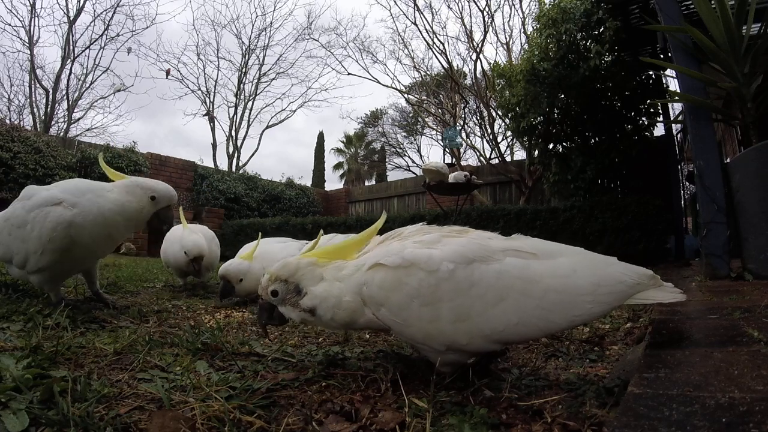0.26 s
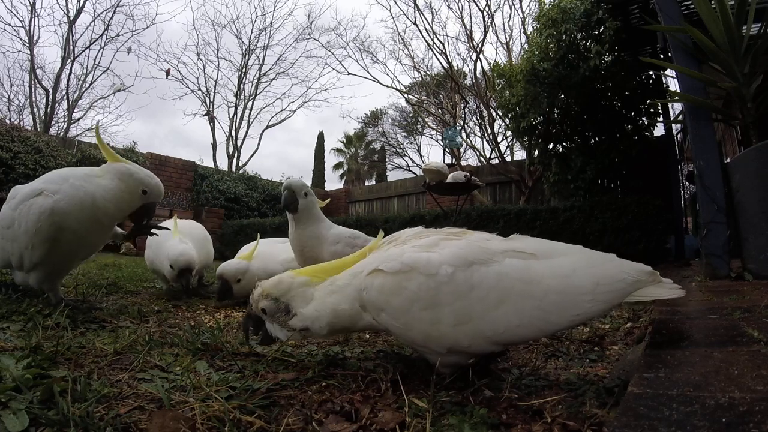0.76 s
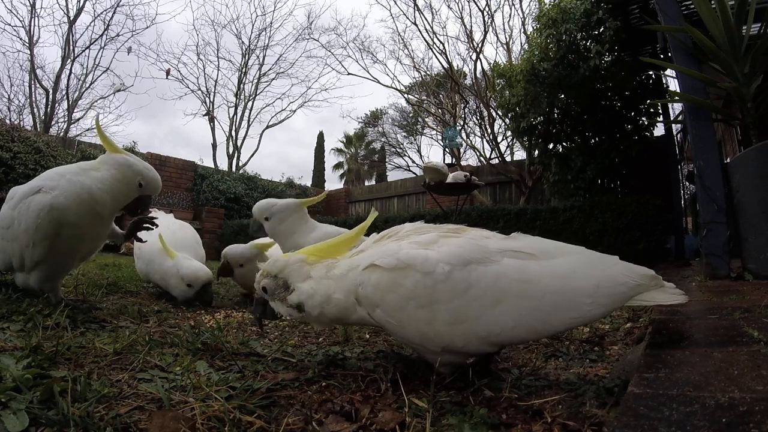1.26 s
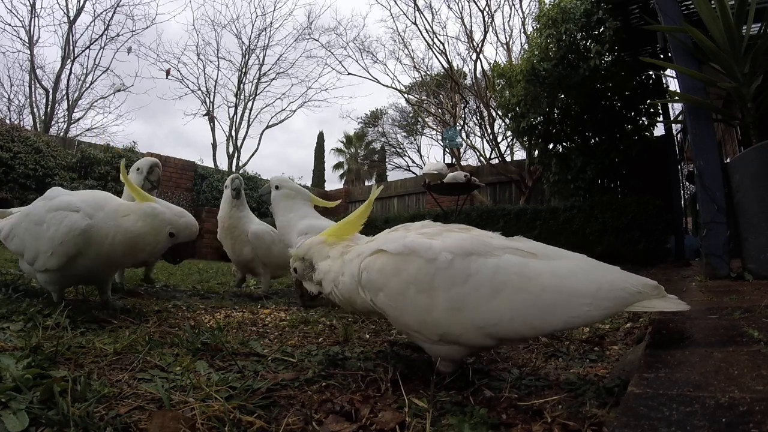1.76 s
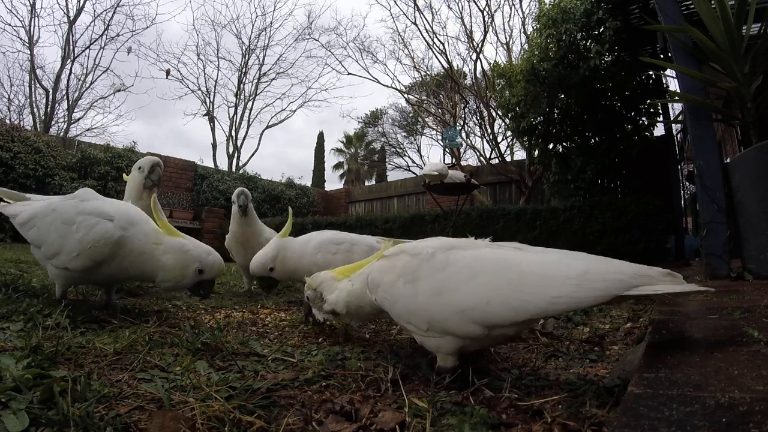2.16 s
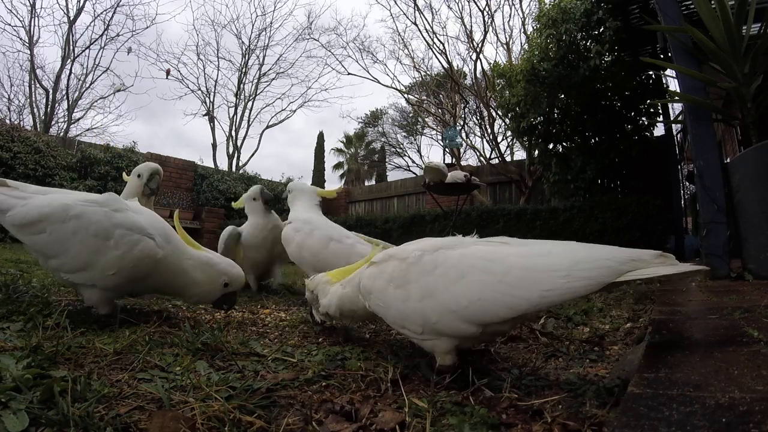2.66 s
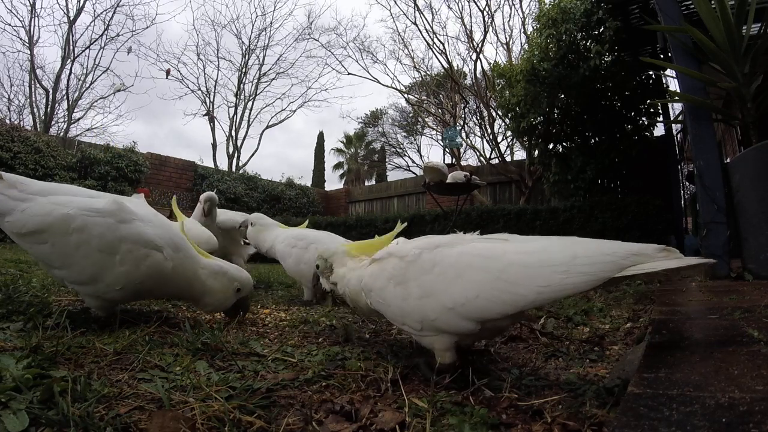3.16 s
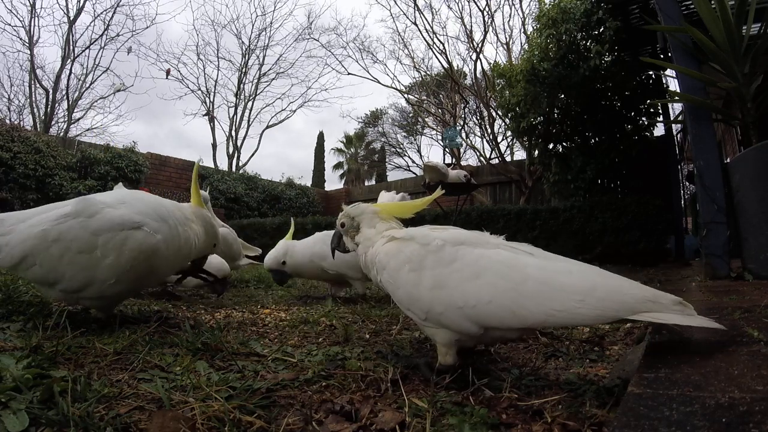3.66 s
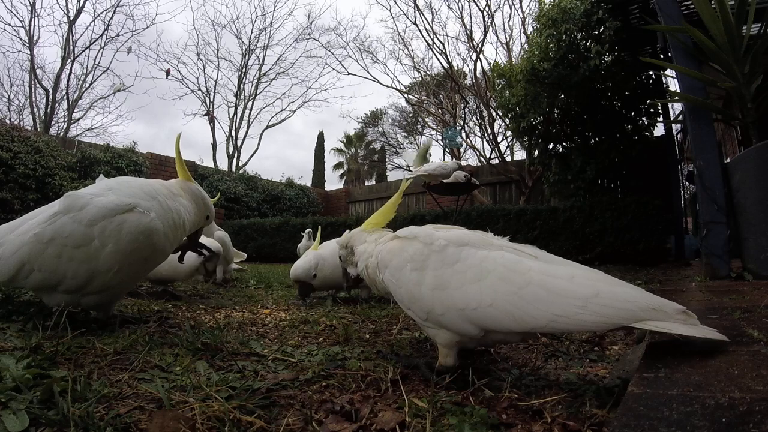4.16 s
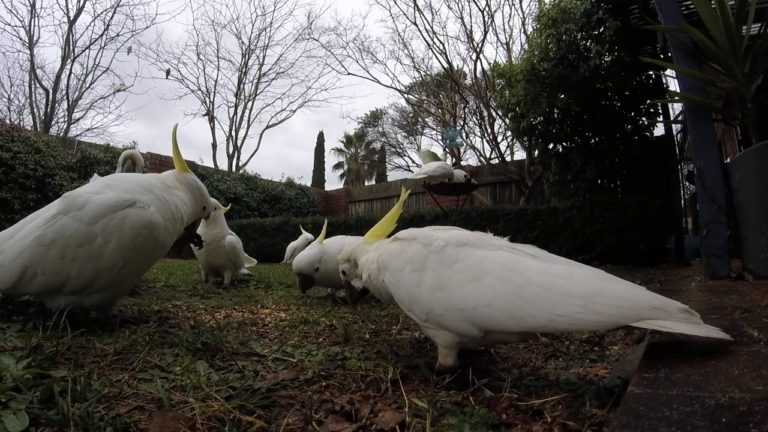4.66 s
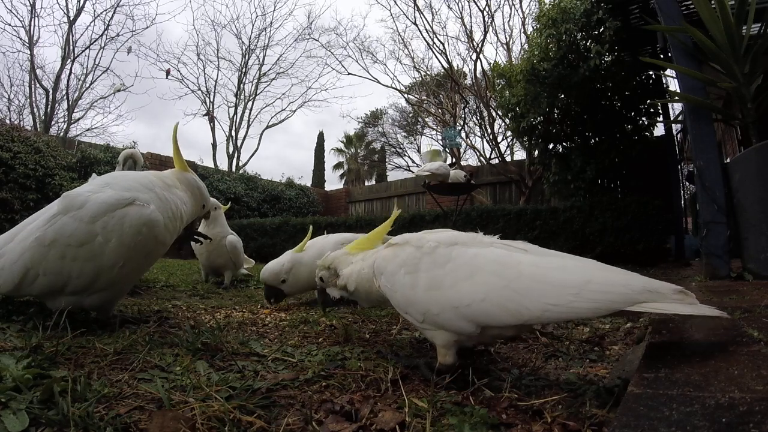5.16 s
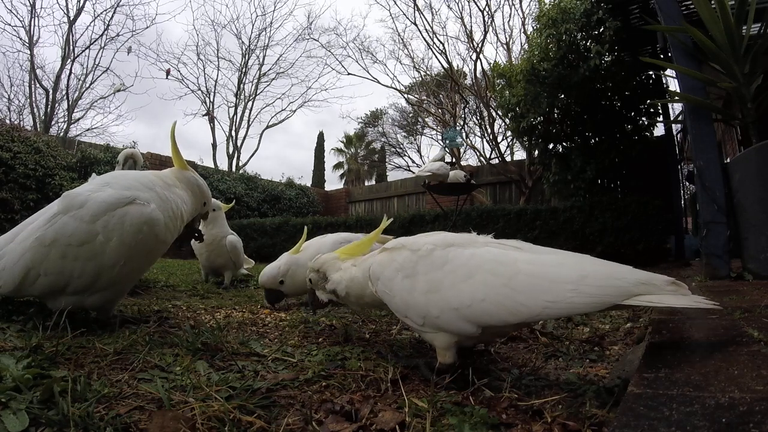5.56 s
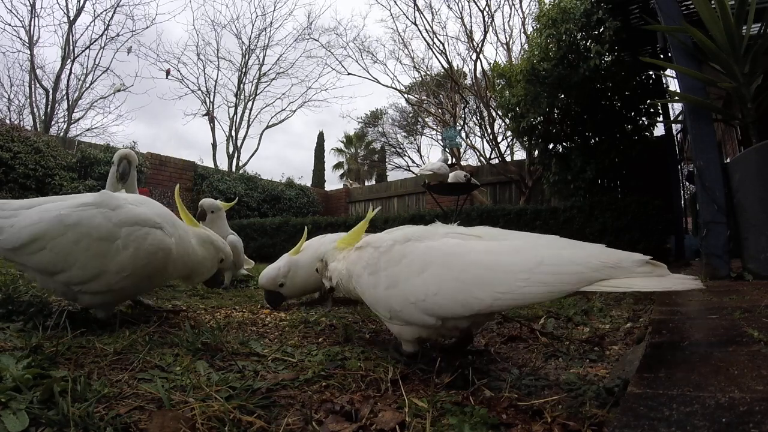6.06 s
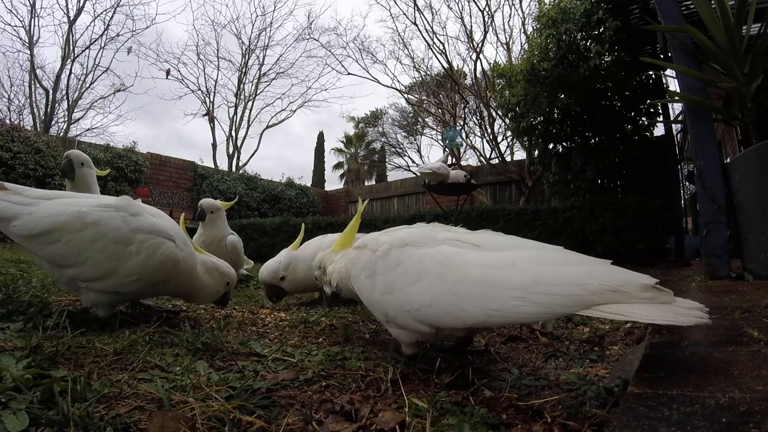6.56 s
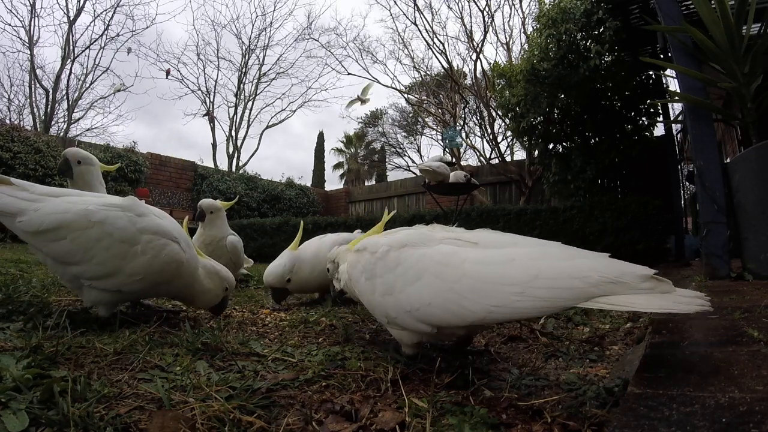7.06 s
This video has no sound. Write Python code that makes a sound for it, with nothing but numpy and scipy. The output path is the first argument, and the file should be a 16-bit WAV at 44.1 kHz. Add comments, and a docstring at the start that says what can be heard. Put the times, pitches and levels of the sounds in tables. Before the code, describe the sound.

A low, steady suburban hum, like distant traffic, runs quietly through about seven seconds in a walled garden. Nearby cockatoos crack seeds throughout, making faint, irregular, dry clicks. In the first second, a few very faint bird calls come from far away. At about 1.4 seconds a cockatoo gives a loud, harsh screech lasting a quarter of a second. A soft low thump, like a wing beat, follows at 2 seconds. Two shorter screeches come at about 2.7 and 2.9 seconds, the first rattling, the second hoarse and crackling, with another soft thump beneath it. Each screech ends in a tiny falling note and a brief echo; they are by far the loudest sounds. Afterwards the quiet feeding clicks continue, with faint distant chirps around 4.2 and 5.2 seconds and a last soft, feathery thump near 6 seconds.

```python
"""A suburb hums around a walled garden. Birds call far off while nearby cockatoos click on seeds.
At 1.4 s a squabble starts with a long, harsh screech: uneven puffs of air from the syrinx (the bird's
voice box) ring in the throat and beak, and the walls answer briefly. A soft low thump follows, then two
shorter screeches near 3 s and a second thump. Each screech ends with a brief falling note.
The feeding clicks go on, with a few more distant chirps and a last thump near 6 s."""
import sys
import numpy as np
from scipy import signal
from scipy.fft import rfft, irfft, next_fast_len
from scipy.io import wavfile
from scipy.ndimage import uniform_filter1d, map_coordinates

SR = 44100
rng = np.random.default_rng(int(sys.argv[2]) if len(sys.argv) > 2 else 0)


def materialize(psi):
    """Save the field psi as 16-bit PCM at rate SR to the path in sys.argv[1].

    A 1-D psi becomes a single channel; in a 2-D psi each row is a channel.
    """
    bounded = np.clip(np.atleast_2d(psi).T, -1, 1)
    quanta = np.round(bounded * 32767).astype(np.int16)
    wavfile.write(sys.argv[1], SR, quanta)


N = 323253

# tone of the background hum: (frequency [Hz], relative level [dB])
HUM_TONE = [(12, -29.5), (20, 0.5), (166, -2), (404, -7), (452, -8), (649, -10), (857, -11.5), (958, -12),
            (1410, -15), (1670, -15.5), (3350, -20), (3850, -21), (13500, -37.5), (15500, -41.5)]
# distant bird calls: (time [s], length [s], pitch [Hz], level [dB], waver [share of the pitch])
CHIRPS = [(0.242, 0.23, 3400, -66, 0.1), (0.278, 0.57, 2700, -66.5, 0.057), (0.48, 0.24, 1780, -64, 0.082),
          (4.199, 0.066, 3290, -68.5, 0.0069), (4.264, 0.058, 3290, -65.5, .006),
          (5.222, 0.063, 6100, -71.5, 0.021)]
# echoes from the nearest hard surfaces: (delay [s], level [dB])
WALL_ECHOES = [(.0076, -17), (0.0128, -17.5)]
# how long the garden echo lasts: (frequency [Hz], time to fade by 60 dB [s])
ECHO_FADE = [(300, 1), (1400, 0.34), (3000, 0.38), (6000, 0.39), (12000, 0.1248)]
# tone of the scattered echo: (frequency [Hz], gain [dB])
ECHO_TONE = [(400, -5), (1400, -8.5), (2450, 2.5), (3000, -1), (4200, -4), (7200, -6.5), (10000, 3.5),
             (14000, 1.5)]
# soft thumps: (time [s], level [dB], pitch [Hz], rustle level [dB])
THUMPS = [(2.006, -51, 181, -79.5), (3.005, -52.5, 151, -72), (5.941, -45.5, 178.5, -60.5)]
# seeds cracking: (time [s], crunch level [dB], ring over crunch [dB], tick over crunch [dB])
SEED_CRACKS = [(0.5055, -68, 19.5, 2), (0.595, -62, -17, 0), (1.3114, -76.5, 8, -2),
               (1.3735, -65.5, 16, 1.5), (1.8866, -66, 6, -4.5), (2.28, -68.5, -1.5, -8),
               (4.0475, -78, 11.5, -9.5), (4.6229, -77.5, 10, -8), (5.0613, -66.5, 10.5, 2),
               (5.6183, -63.5, 3.5, -0.5), (5.6296, -62, -4, -7), (5.673, -67.5, -2, -10),
               (5.7855, -68, 4, 3), (6.4684, -68, -0.5, -11), (6.4814, -72, 20.5, -5.5),
               (6.8563, -61, 5, -13), (6.8679, -72, 8, -2)]
# how the seed husk, the hard bill and the hollow of the beak ring:
# (frequency [Hz], width [Hz], relative level [dB])
HUSK_RING = [(1810, 630, -5), (2610, 462, -1.5), (3310, 500, 1.5), (4123, 600, -4)]
BILL_RING = [(6173, 560, 1.5), (7600, 1047, -4.5), (8340, 560, -4.5), (10194, 660, -21.5)]
MOUTH_RING = [(1409, 210, 3.5), (1920, 300, -15)]
# falling notes that end the screeches:
# (time [s], length [s], first pitch [Hz], last pitch [Hz], tone level [dB], mouth ring level [dB])
SQUAWKS = [(1.676, 0.028, 459, 311, -47.5, -26), (2.795, 0.028, 422, 317, -48, -28),
           (3.041, 0.09, 923, 813, -42, -58)]
# screeches, with the base levels of their low, middle and high bands when the beak is wide open:
# (time [s], length [s], rise time [s], time until the beak is widest [s], throaty level [dB],
#  piercing level [dB], shrill level [dB], shrillness lost with the beak closed [dB])
SCREECHES = [(1.423, 0.25, .015, 0.15, -20.5, -18.5, -21.5, 34.5),
             (2.675, 0.12, 0.013, 0.06, -27.5, -21, -36.5, 8),
             (2.924, 0.19, 0.011, 0.12, -29, -29, -35.5, 15.5)]
# how throat and beak ring in each screech: (frequency [Hz], width [Hz], relative level [dB])
LONG_THROAT = [(972.2, 40, -12), (1419, 155, 4.5), (1988, 242, -2.5), (2306, 37, -1.5), (2571, 86, -4),
               (2908, 88, 2.5), (3248, 92, 3), (4000, 222, -6), (6220, 280, -10.5), (7426, 560, -16)]
SHORT_THROAT = [(1050, 96, -11), (1402, 40, 8), (1900, 1050, -12), (2320, 160, -2), (3000, 460, -0.5),
                (3250, 83, 7.5), (3730, 430, -5), (4460, 420, -26), (5960, 160, -16), (7440, 480, -21.5)]
HOARSE_THROAT = [(540, 190, -19.5), (1430, 135, 7), (1815, 139, 7), (2500, 150, -3), (2955, 144, 3.5),
                 (3370, 140, 3.5), (3890, 590, -3), (4930, 250, -12.5), (5240, 250, -14), (6300, 470, -8.5),
                 (7250, 490, -12.5)]
# how well the beak sends out each frequency: (frequency [Hz], gain [dB])
BEAK_TONE = [(300, 8.5), (700, 1), (1050, 1), (1520, -2.5), (1690, -8.5), (1860, 1), (4100, -4), (5150, -6),
             (5900, -1), (7700, 0), (9000, -4.5), (11500, -3.5), (12700, -10.5), (15000, -7)]
# moments when the bird pushes harder: (time [s], half length [s], boost in strain [dB])
SURGES = [(1.505, .028, 4), (2.721, 0.0088, 3), (2.955, 0.0054, 3), (3.045, .008, 6)]

RELEASE_S = 0.0104  # how fast the air pressure dies away after a screech
STRAIN_LAG = 1.86  # strain builds this many times slower than pressure
EASE_S, EASE_DB = 0.03, 5  # strain eases just before the end
END_OPENING = 0.54  # how far the beak is still open at the end, from 0 to 1
THROATY_LOSS_DB, PIERCING_LOSS_DB, HISS_LOSS_DB = 7.5, 1, 9.5  # lost with the beak closed


def amp(db):
    """Turn decibels into a number to multiply by."""
    return 10 ** (np.asarray(db) / 20)


def unit(x):
    """Scale a signal so that its average strength (rms) is 1."""
    return x / np.sqrt(np.mean(x ** 2) + 1e-20)


def along(points, hz):
    """Read between (frequency, value) points, giving each octave equal room."""
    f, values = np.transpose(points)
    return np.interp(np.log(hz + 1), np.log(f + 1), values)


def wobble(rate, size):
    """A smooth random curve that passes through `rate` new values a second."""
    knots = rng.standard_normal(int(size * rate / SR) + 4)
    return map_coordinates(knots, [np.arange(size) * rate / SR])


def filtered(x, response):
    """Change the strength and timing of each frequency f in x by response(f)."""
    size = next_fast_len(len(x) + SR // 4)
    return irfft(rfft(x, size) * response(np.fft.rfftfreq(size, 1 / SR)), size)[:len(x)]


def resonances(modes, f):
    """The response of something that rings at each (frequency, width, level) in a table."""
    return sum((-1) ** k * amp(db) * 1j * f * width / (hz * hz - f * f + 1j * f * width)
               for k, (hz, width, db) in enumerate(modes))


def highpass(f, edge_hz):
    """A response that weakens the bass by 12 dB for each octave below the edge."""
    s = 1j * f / edge_hz
    return s * s / (s * s + np.sqrt(2) * s + 1)


def steady(x):
    """Even out the loudness over a few puffs, as a steady air pressure does."""
    return x / np.sqrt(np.abs(uniform_filter1d(x * x, size=600)) + 1e-12)


def add(track, start, sound):
    """Mix a sound into the track, beginning at `start` seconds."""
    part = track[round(start * SR):][:len(sound)]
    part += sound[:len(part)]


def suburb(level_db, drift_db):
    """Distant traffic and air in the trees make an almost steady hum."""
    noise = unit(filtered(rng.standard_normal(N), lambda f: amp(along(HUM_TONE, f))))
    return noise * amp(level_db + drift_db * wobble(2.98, N))


def distant_birds():
    """Faint calls: a small waver in pitch sounds pure, a large one hoarse."""
    out = np.zeros(N)
    for start, length, hz, db, waver in CHIRPS:
        size = int(length * SR)
        pitch = hz * (1 + waver * wobble(500, size))
        phase = 2 * np.pi * np.cumsum(pitch) / SR
        add(out, start, amp(db) * np.hanning(size) * np.sin(phase))
    return out


def garden_echo(x, scatter_db, build_s):
    """Near surfaces answer first; then walls, fence and hedges scatter a short echo."""
    hz, t, spectrum = signal.stft(rng.standard_normal(SR * 3 // 4), SR, nperseg=256)
    fade = amp(-60 * t / along(ECHO_FADE, hz)[:, None])
    build = 1 - np.exp(-t / build_s)
    _, tail = signal.istft(spectrum * fade * build, SR, nperseg=256)
    scattered = signal.fftconvolve(x, tail / np.linalg.norm(tail))[:N]
    walls = lambda f: sum(amp(db) * np.exp(-2j * np.pi * f * delay) for delay, db in WALL_ECHOES)
    return filtered(x, walls) + amp(scatter_db) * filtered(scattered, lambda f: amp(along(ECHO_TONE, f)))


def thumps(swell_s, rustle_s):
    """Soft low thumps with a brush of feathers, perhaps a wing pushing the air."""
    out, t = np.zeros(N), np.arange(SR // 5) / SR
    swell = lambda peak_s: (t / peak_s * np.exp(1 - t / peak_s)) ** 2
    feather_tone = lambda f: highpass(f, 1000) / (1 + 1j * f / 3500) / (1 + 1j * f / 10000)
    for start, db, hz, rustle_db in THUMPS:
        thump = amp(db) * swell(swell_s) * np.sin(2 * np.pi * hz * t)
        feathers = unit(filtered(rng.standard_normal(len(t)), feather_tone))
        add(out, start, thump + amp(rustle_db) * swell(rustle_s) * feathers)
    return out


def seed_clicks(crack_s, nibbles_per_s, nibble_db, spread_db):
    """A seed cracks, the hard bill ticks and the hollow beak rings; faint nibbles fall in between."""
    out, t = np.zeros(N), np.arange(SR // 20) / SR
    tap = np.exp(-t / 0.0001)
    ring = unit(filtered(tap, lambda f: resonances(MOUTH_RING, f) ** 2))
    chance = rng.random((int(nibbles_per_s * N / SR), 2))
    # same columns as SEED_CRACKS
    nibbles = [(when * N / SR, nibble_db + spread_db * (2 * force - 1), 6, -2) for when, force in chance]
    for start, db, ring_db, tick_db in [*SEED_CRACKS, *nibbles]:
        crack = rng.standard_normal(len(t)) * np.exp(-t / crack_s)
        crunch = unit(filtered(crack, lambda f: resonances(HUSK_RING, f)))
        tick = unit(filtered(crack, lambda f: resonances(BILL_RING, f)))
        add(out, start, amp(db) * (crunch + amp(ring_db) * ring + amp(tick_db) * tick))
    return out


def squawks():
    """As the air pressure falls, the voice box briefly settles into a falling note."""
    out = np.zeros(N)
    for start, length, first_hz, last_hz, tone_db, ring_db in SQUAWKS:
        size = int(length * SR)
        phase = 2 * np.pi * np.cumsum(np.linspace(first_hz, last_hz, size)) / SR
        overtones = sum(np.sin(k * phase) for k in range(2, 8))
        ring = unit(filtered(overtones, lambda f: resonances(MOUTH_RING, f) ** 2))
        add(out, start, np.hanning(size) * (amp(tone_db) * np.sin(phase) + amp(ring_db) * ring))
    return out


def syrinx(slap_hz, jitter, spread_db, puff_s, leak, snap):
    """Thin flaps in the voice box slap shut at uneven times; each slap frees a puff of rushing air."""
    size = SR // 2
    t = np.arange(size) / SR
    timing, force = rng.standard_normal((size // 100, 2)).T
    starts = np.cumsum(np.exp(jitter * timing) * SR / slap_hz).astype(int)
    slaps = np.bincount(starts, amp(spread_db * force), size)[:size]
    flow = unit(signal.fftconvolve(slaps, np.exp(-t / puff_s))[:size])
    return unit((flow + leak) * rng.standard_normal(size)) + snap * unit(slaps)


def screech(row, throat, air, low_hz, high_hz, drift, hiss_db):
    """Puffs of air ring in the throat; strain makes the cry piercing and an open beak makes it shrill."""
    start, length, rise_s, widest_s, throaty_db, piercing_db, shrill_db, shrill_loss_db = row
    samples = np.arange(len(air))
    t = samples / SR
    # pressure rises, holds and dies away; strain follows it
    release = np.exp(-np.maximum(t - length, 0) / RELEASE_S)
    surge_db = sum(db * np.exp(-((start + t - when) / half_s) ** 2) for when, half_s, db in SURGES)
    pressure = (1 - np.exp(-t / rise_s)) ** 2 * release * amp(0.5 * surge_db)
    easing = amp(np.interp(t, [length - EASE_S, length], [0, -EASE_DB]))
    strain = (1 - np.exp(-t / (STRAIN_LAG * rise_s))) ** 3 * easing * release * amp(surge_db)
    closed = 1 - np.interp(t, [0, widest_s, length], [0, 1, END_OPENING])
    beak = lambda f: highpass(f, low_hz) * amp(along(BEAK_TONE, f)) / (1 + (f / high_hz) ** 6)
    voice = filtered(air, lambda f: resonances(throat, f) * beak(f))
    # tongue and beak move, so the ringing wanders in pitch
    wander = np.cumsum(drift * wobble(25, len(air)))
    voice = map_coordinates(voice, [samples + wander], mode="mirror")
    # split the voice into four bands, from low to high
    below = [filtered(voice, lambda f: 1 / (1 + (f / hz) ** 24)) for hz in (2200, 5150, 8700)]
    throaty, piercing, shrill, hiss = np.diff([0 * voice, *below, voice], axis=0)
    # the hiss comes mostly at the peak of each puff, and grows faster than the strain
    puff_power = np.abs(uniform_filter1d(unit(air) ** 2, size=70))
    hiss = hiss * puff_power ** 0.3 / np.std(throaty)
    cry = (pressure * amp(throaty_db - THROATY_LOSS_DB * closed) * steady(throaty)
           + strain * amp(piercing_db - PIERCING_LOSS_DB * closed) * steady(piercing)
           + np.sqrt(pressure * strain) * amp(shrill_db - shrill_loss_db * closed) * steady(shrill)
           + strain ** 1.4 * amp(throaty_db + hiss_db - HISS_LOSS_DB * closed) * hiss)
    out = np.zeros(N)
    add(out, start, cry)
    return out


def cockatoos():
    """The squabble: a long dense screech, a short rattling one and a hoarse, crackling one."""
    dense = syrinx(slap_hz=215, jitter=0.25, spread_db=1.8, puff_s=0.002, leak=0.28, snap=0.35)
    rattling = syrinx(slap_hz=160, jitter=0.21, spread_db=1.8, puff_s=0.0026, leak=0.22, snap=0.3)
    crackling = syrinx(slap_hz=225, jitter=0.32, spread_db=3, puff_s=0.0017, leak=0.3, snap=0.5)
    long = screech(SCREECHES[0], LONG_THROAT, dense, low_hz=740, high_hz=17000, drift=0.006, hiss_db=1.5)
    short = screech(SCREECHES[1], SHORT_THROAT, rattling,
                    low_hz=921, high_hz=11290, drift=0.0068, hiss_db=-3.5)
    hoarse = screech(SCREECHES[2], HOARSE_THROAT, crackling,
                     low_hz=483, high_hz=12500, drift=0.008, hiss_db=2)
    return long + short + hoarse


def scene():
    """Mix birds, echo and background; the feeding birds are nearest, so their clicks echo less."""
    calls = cockatoos() + squawks() + distant_birds()
    clicks = seed_clicks(crack_s=0.0015, nibbles_per_s=3, nibble_db=-78, spread_db=5)
    echo = garden_echo(calls + amp(-3.5) * clicks, scatter_db=-9.5, build_s=0.0033)
    background = thumps(swell_s=0.017, rustle_s=0.016) + suburb(level_db=-57, drift_db=0.05)
    return (calls + clicks + echo + background)[None]


def record(dry):
    """Cut away the highest treble, everything above 15400 Hz."""
    return filtered(dry[0], lambda f: f < 15400)[None]


dry = scene()
out = record(dry)
materialize(out)
```